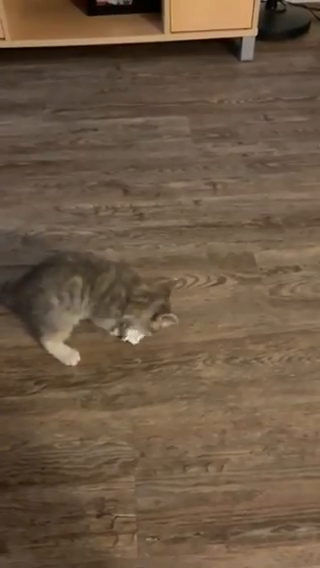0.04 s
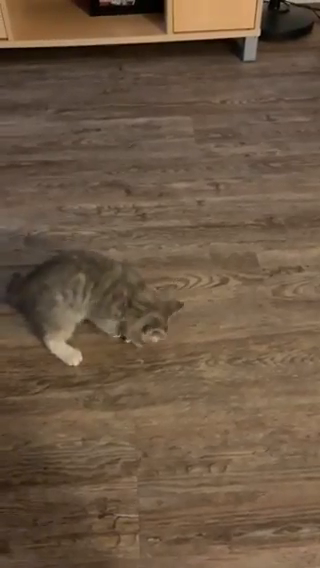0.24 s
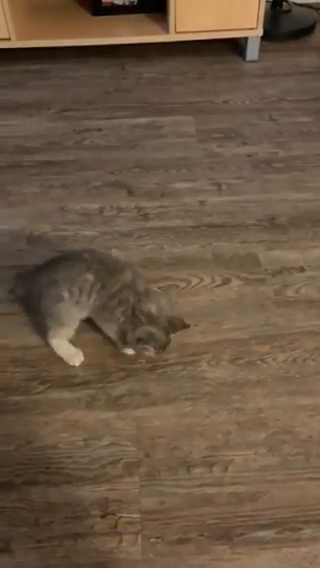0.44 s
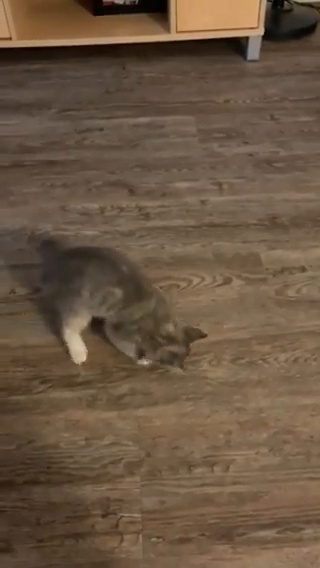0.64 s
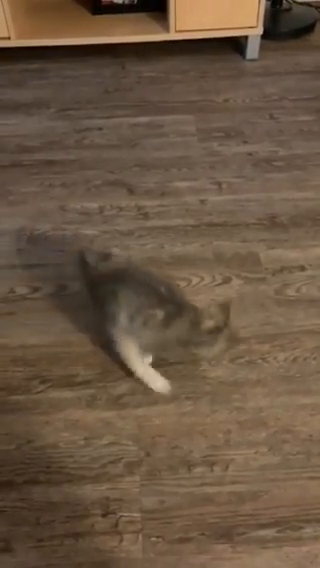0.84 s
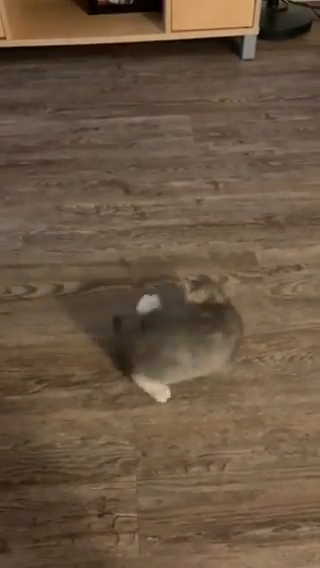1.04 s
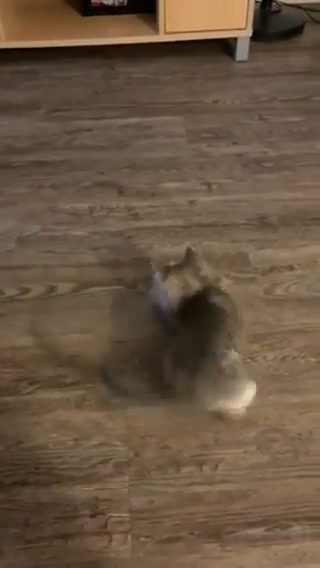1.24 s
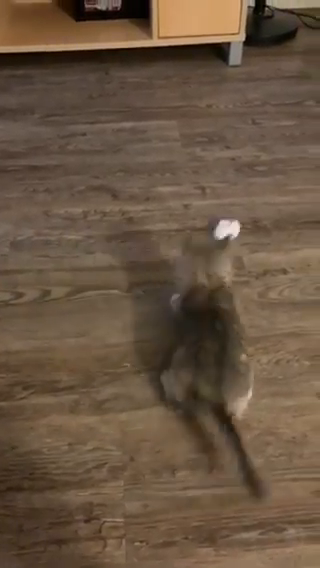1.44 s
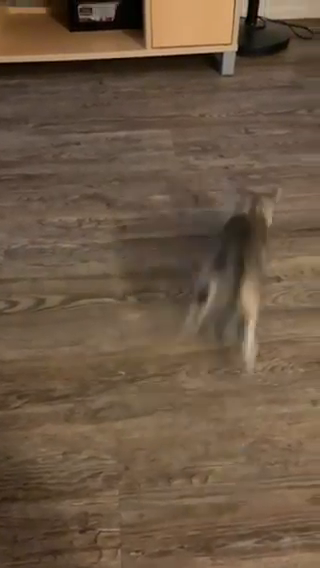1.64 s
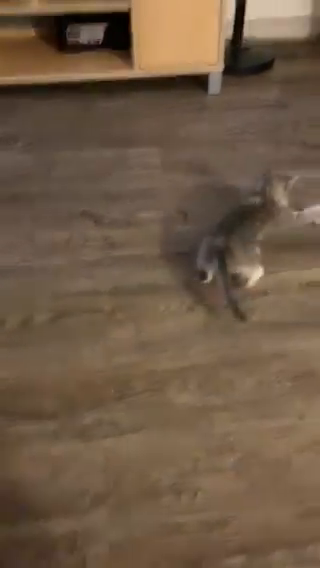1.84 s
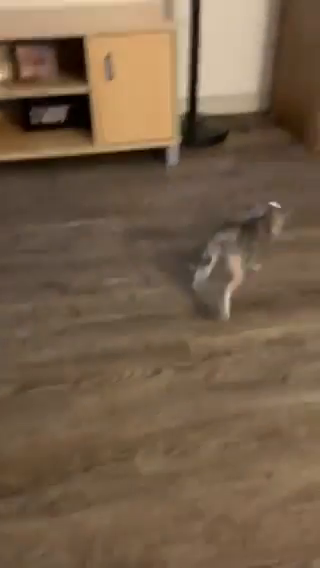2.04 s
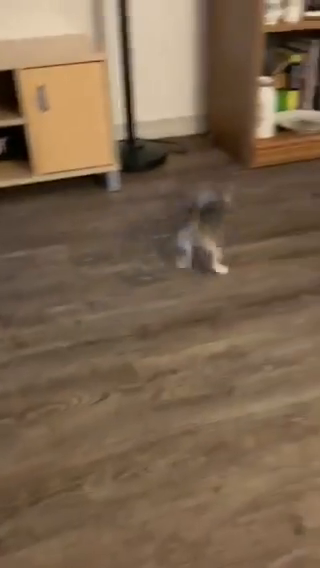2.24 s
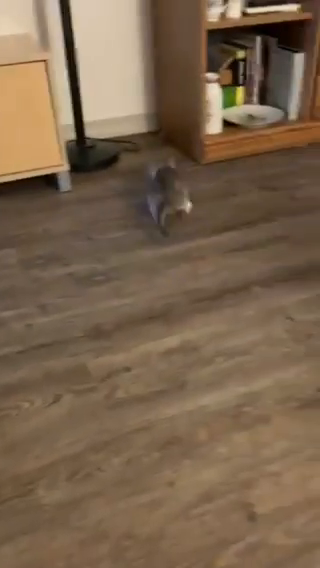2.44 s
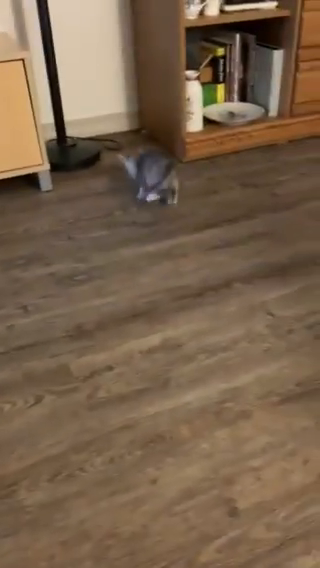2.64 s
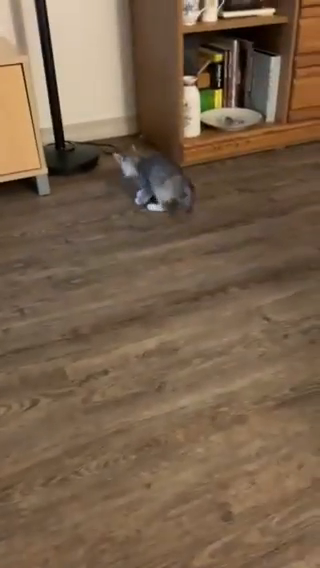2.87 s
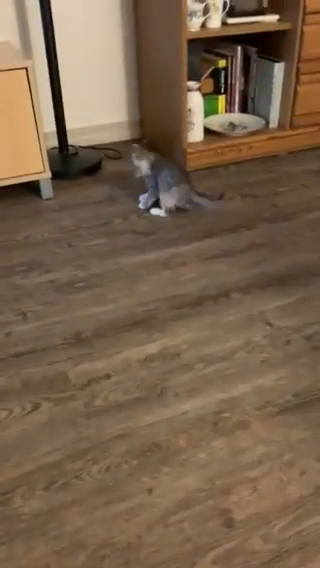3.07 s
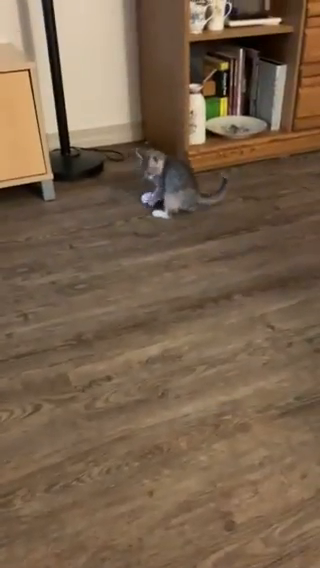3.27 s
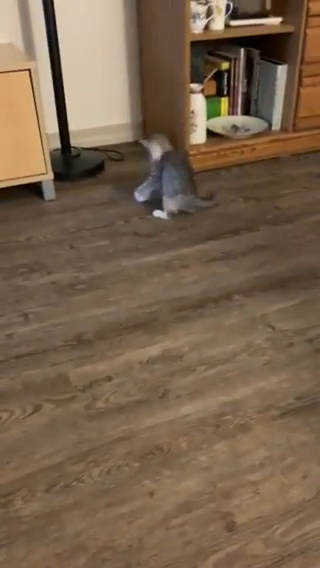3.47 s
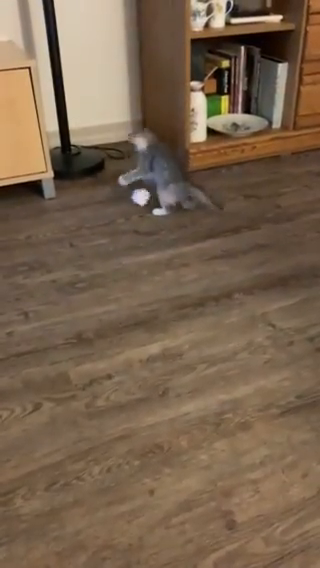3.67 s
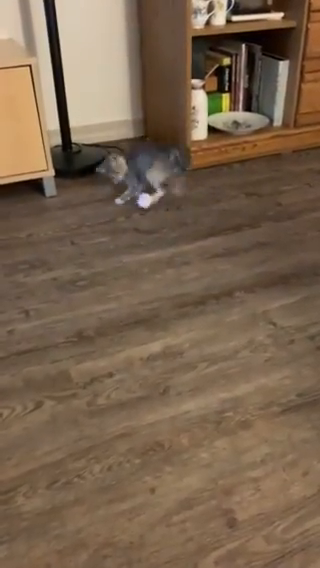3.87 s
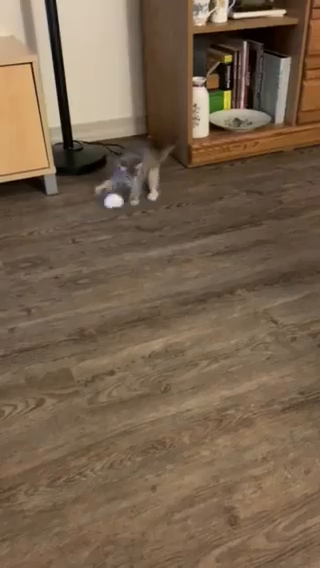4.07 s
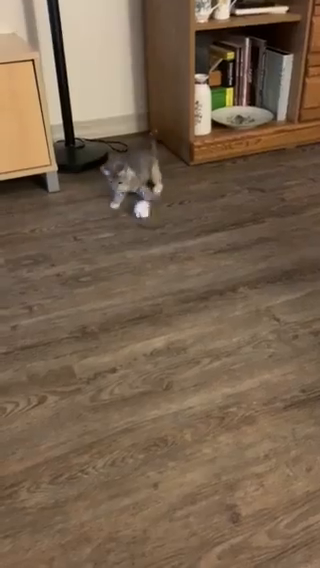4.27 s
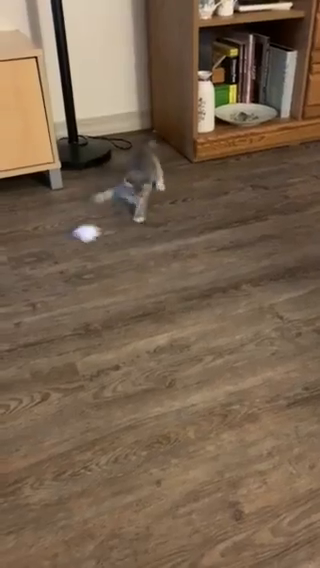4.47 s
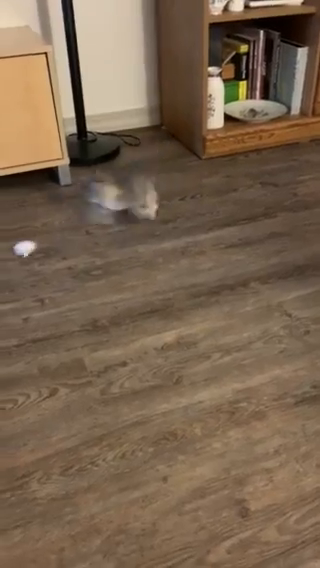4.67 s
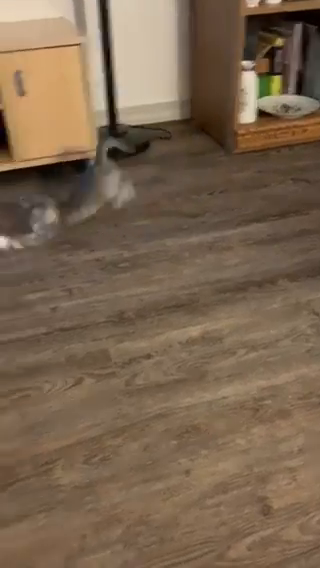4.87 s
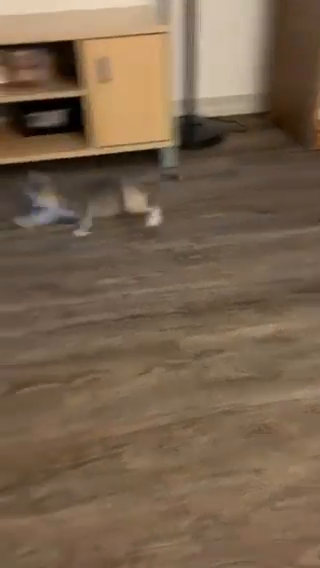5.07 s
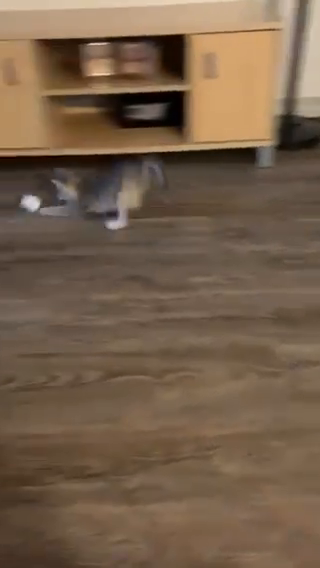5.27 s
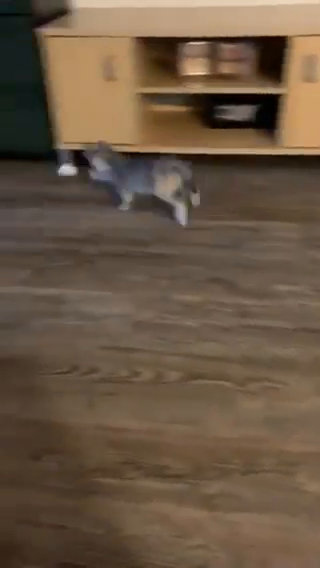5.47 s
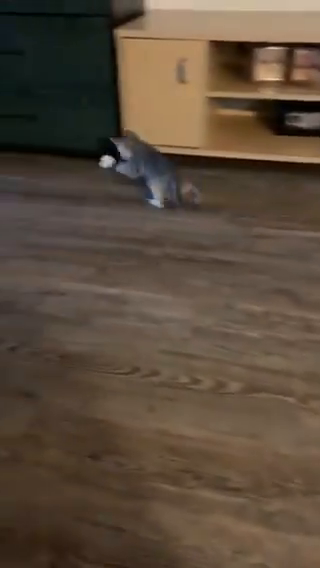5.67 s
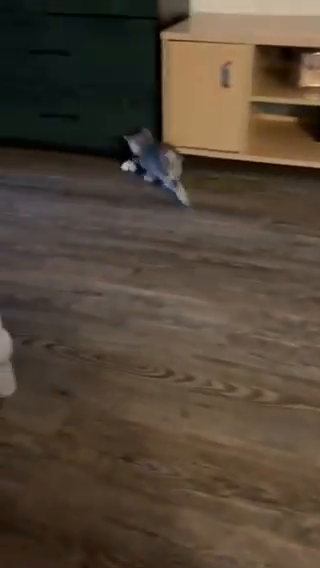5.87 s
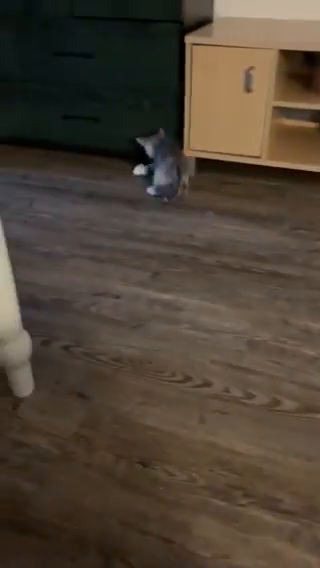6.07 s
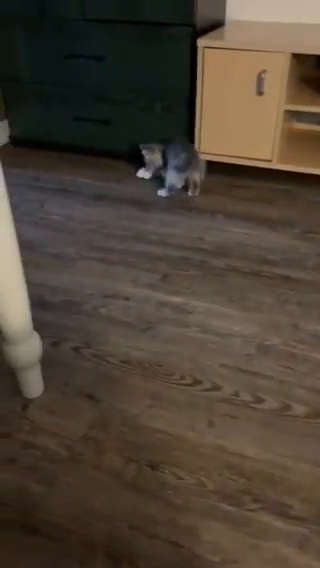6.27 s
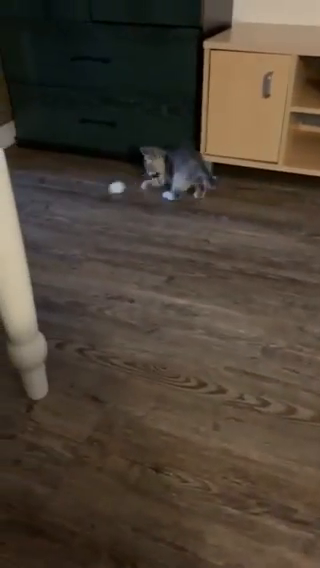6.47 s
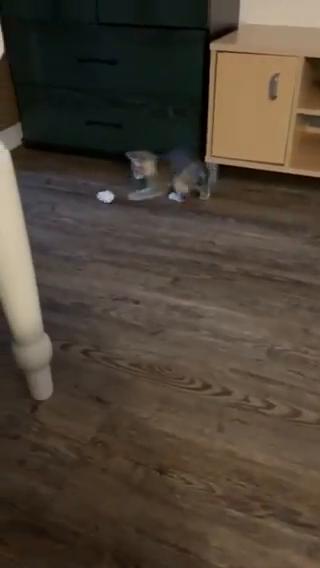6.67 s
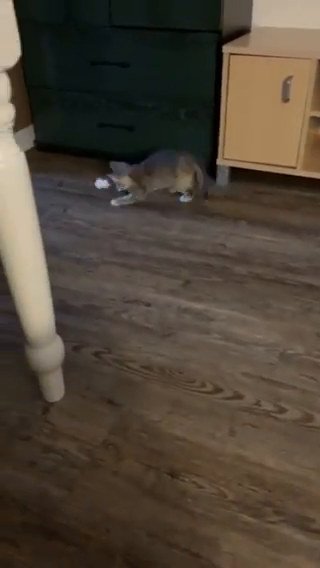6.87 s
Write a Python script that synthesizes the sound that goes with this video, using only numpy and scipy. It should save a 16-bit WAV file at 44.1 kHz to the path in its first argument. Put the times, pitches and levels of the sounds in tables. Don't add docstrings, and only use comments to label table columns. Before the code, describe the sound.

A kitten bats a crumpled paper ball across a wooden floor, with dry crackly skids, claw clicks and soft paw thuds in a small room.

```python
import sys
import numpy as np
from scipy import signal
from scipy.fft import rfft, irfft, next_fast_len
from scipy.io import wavfile
from scipy.ndimage import uniform_filter1d, map_coordinates

SR = 44100
rng = np.random.default_rng(int(sys.argv[2]) if len(sys.argv) > 2 else 0)


def wrap_up_sound(samples):
    columns = np.atleast_2d(samples).T
    tamed = np.clip(columns, -1, 1)
    steps = np.round(tamed * 32767).astype(np.int16)
    wavfile.write(sys.argv[1], SR, steps)


def attenuation_scalar(level_db):
    decades = np.asarray(level_db, float) / 20
    return 10 ** decades


N = 305172

# (peak time [s], level [dB], brightness [dB], favoured resonance [Hz], fall [dB/s])
FLICKS = [(0.482, -62, -10, 1660, 248.5), (0.892, -61, -14, 2220, 92), (1.672, -55.5, 3.5, 2170, 218),
          (2.082, -45.5, -23, 2100, 182), (2.284, -42.5, -4, 1870, 115), (3.26, -41.5, -7.5, 1950, 152),
          (3.534, -43, -2, 2900, 173), (3.74, -51, -11, 2400, 146), (3.987, -49, -6, 2700, 193),
          (4.387, -42, -1.5, 2800, 129), (4.632, -45, -4, 2360, 214), (4.718, -44.5, -11, 1810, 90.5),
          (4.872, -36, 1, 2930, 200), (5.154, -46.5, -15, 2420, 903), (5.263, -33, -8, 2450, 35),
          (6.232, -54.5, -33, 1860, 205), (1.27, -46.5, -1.5, 4300, 40), (1.877, -36, -2.5, 2670, 131),
          (6.409, -41, -3.5, 2840, 13), (6.802, -40, -8, 2080, 57)]
# (peak time [s], level [dB], brightness [dB], favoured resonance [Hz], fall [dB/s])
SLIDES = [(1.389, -48.5, -5.5, 4860, 88), (1.58, -55, -9, 1680, 40), (1.8, -60.5, -8, 2450, 100),
          (2.474, -42.5, -6.5, 1550, 181), (4.18, -50, -5.5, 1800, 60), (4.55, -51, -7, 2135, 114),
          (5.03, -56, -13, 2430, 140), (5.469, -44.5, 2, 2290, 76), (5.78, -53.5, -4, 2060, 42.3),
          (5.926, -50.5, -6, 1800, 156), (6.62, -52, -6.5, 1466, 58.7), (4.27, -64, -14, 2200, 60),
          (6.02, -61, -16, 1520, 120)]
# (frequency [Hz], level [dB])
PAPER_BODY = [(300, -18.5), (700, -8.5), (1200, -1.5), (2200, -2), (3300, -1), (4500, -5), (7000, -28.5)]
# (frequency [Hz], level [dB])
PAPER_EDGE = [(3500, -20), (5200, 0.5), (6200, -0.5), (7600, -3.5), (8700, 0.5), (9600, -0.5),
              (11000, -7.5), (13000, -8), (16000, -12)]
# (time [s], peak [dB], ring [Hz], treble [dB], treble centre [Hz])
CORNERS = [(1.275, -32, 1640, -6, 6000), (1.473, -36, 1370, -21, 11200), (1.511, -38.5, 1320, -19, 6500),
           (1.606, -36, 1550, -17, 5810), (1.855, -22.5, 3600, -13.5, 6060), (1.887, -22, 2380, -15, 7200),
           (2.077, -30.5, 1110, -20.5, 10000), (3.514, -28.5, 2940, -15, 7500),
           (3.578, -48, 2800, -10, 7090), (4.381, -28, 2600, -15, 12000), (4.505, -34.5, 1280, -18, 11600),
           (4.617, -25.5, 2970, -22, 5950), (4.708, -36, 2700, -19, 11500), (4.721, -20, 1910, -37, 6700),
           (4.881, -32, 3400, -24, 6260), (5.257, -19.5, 2030, -14.5, 5950),
           (5.272, -15.5, 2040, -22.5, 5900), (5.383, -29.5, 1410, -18, 5270),
           (5.399, -31, 1220, -4, 11000), (6.393, -28.5, 3040, -20, 7400), (6.477, -41, 2830, -2.5, 11100),
           (6.493, -34.5, 1310, -11, 5990), (6.519, -30.5, 1270, -12, 6800),
           (6.582, -34.5, 1240, -7.5, 10400), (6.617, -36, 1920, -12.5, 10600),
           (6.797, -25.5, 2980, -26, 5410), (6.892, -38, 1540, -3.5, 8350)]
# (time [s], peak [dB], ring [Hz], treble [dB], treble centre [Hz])
RATTLES = [(1.214, -41, 1580, -21, 7050), (1.284, -34, 4200, -7, 6040), (1.31, -36, 4400, -6, 6740),
           (1.436, -39, 4600, -16, 5910), (1.86, -32, 3670, -22, 6350), (1.872, -33, 3440, -12, 8700),
           (1.894, -18, 2460, -10.5, 7350), (1.899, -42, 2360, -18, 7600), (1.923, -33, 2350, -23, 5500),
           (3.7245, -42, 3460, -6.5, 7000), (4.674, -34, 1750, -12.5, 5900), (4.839, -42, 1740, -18, 12000),
           (4.847, -26, 3060, -10, 8500), (4.854, -27, 3000, -2.5, 10200), (4.869, -24, 2920, -8, 7900),
           (4.884, -21, 3000, -12, 9500), (5.03, -22, 3800, -13.5, 5580), (5.143, -26.5, 1870, -12, 5900),
           (5.147, -23.5, 2600, -11.5, 8900), (5.1695, -20.5, 1210, -11, 8300),
           (5.214, -35, 1630, -2.5, 8500), (5.237, -24, 1510, -12, 9000), (5.2525, -15, 2000, -10, 9600),
           (5.262, -29, 2030, 8, 8700), (5.268, -24, 2800, -17, 5930), (5.278, -29, 2540, -13, 6250),
           (5.327, -25.5, 1960, 0, 10100), (5.332, -19.5, 1290, -5, 10600),
           (5.403, -27.5, 2800, -11, 10400), (6.407, -44.5, 3000, -14, 9000), (6.418, -34, 2660, -19, 9000),
           (6.44, -28, 2650, -21, 6160), (6.457, -30, 1060, -24, 5930), (6.644, -36.5, 1380, -11, 6360),
           (6.773, -27.5, 1260, -9.5, 7220), (6.816, -27, 2320, -20, 6000), (6.8385, -35, 2180, 0, 10500)]
# (time [s], peak [dB], ring [Hz], treble [dB])
CLAWS = [(0.4705, -55, 1120, -31), (0.8917, -43.5, 2960, -12), (0.999, -50, 2940, -13),
         (1.0576, -50, 1710, -14), (1.0994, -51, 970, -15), (4.1267, -46, 2350, -6),
         (1.751, -46, 1340, -11), (1.8152, -41.5, 1660, -11.5), (1.9824, -40.5, 1560, -15),
         (2.1023, -30, 3330, -12), (2.2678, -23.5, 1490, -15), (2.3664, -53, 1210, -25),
         (2.405, -42.5, 1700, -6.5), (3.3656, -47, 1700, -14), (3.7282, -31.5, 1290, -16),
         (3.811, -41, 1590, -11), (3.9582, -39, 2970, -14), (4.0215, -44.5, 1710, -11),
         (4.0967, -35, 1810, -27), (4.1444, -33, 1640, -17), (4.4187, -31, 2130, -8),
         (4.5373, -31.5, 1430, -11), (5.004, -39, 1280, -10.5), (5.6241, -38.5, 2820, -12.5),
         (5.688, -44, 1830, -12.5), (5.7379, -37, 1010, -17), (5.82, -45, 1020, -2)]
# (time [s], peak [dB], ring [Hz], treble [dB], t60 [s])
SWIPES = [(0.876, -41, 1540, -8, 0.17), (1.2084, -36, 1530, -17, 0.2), (1.236, -32, 2850, -8.5, 0.075),
          (1.652, -30, 4020, -12.5, 0.13), (1.8422, -26.5, 3730, -9, 0.12),
          (2.2438, -35.5, 1350, -31, 0.34), (2.4307, -37, 1046, -23, 0.21), (2.6922, -55, 1030, -13, 0.12),
          (3.23, -39, 2820, -18, 0.39), (3.475, -35.5, 3020, -9.5, 0.27), (4.337, -34, 2000, -8.5, 0.083),
          (4.8378, -31.5, 2850, -17, 0.09), (5.2358, -32.5, 2000, -5.5, 0.18),
          (6.1874, -44, 3000, -12.5, 0.3), (6.3495, -33.5, 1020, -14, 0.2), (6.7675, -32, 2290, -7, 0.14),
          (1.672, -37.5, 3860, 1.5, 0.058), (4.456, -34.5, 2400, -5, 0.07),
          (4.389, -27.5, 2950, -26, 0.054)]
# (frequency [Hz], level [dB])
FLOOR_KNOCK = [(130, -55), (330, -3), (600, 0), (900, -5), (1700, -40)]
# (time [s], peak [dB], centre [Hz], t60 [s])
SLAPS = [(0.82, -59, 563, 0.039), (2.147, -46, 410, 0.049), (2.266, -42, 506, 0.08), (2.44, -53, 500, 0.27),
         (3.115, -68, 844, 0.47), (3.814, -45.5, 480, 0.042), (4.436, -59, 350, 0.12),
         (4.884, -51.5, 402, 0.14), (5.201, -55, 284, 0.28), (5.875, -58.5, 700, 0.43),
         (6.47, -50.5, 990, 0.38), (6.8, -53, 280, 0.16)]
# (time [s], peak [dB], board note [Hz], weight on the boards [dB])
PAWS = [(0.589, -49, 90, -60), (0.819, -51, 120, -57), (0.899, -45, 86, -56), (0.993, -51, 150, -55),
        (1.065, -50.5, 121, -61.5), (1.154, -54, 72.7, -62), (1.237, -64, 155, -61), (1.543, -54, 117, -64),
        (1.636, -40.5, 99, -54), (1.75, -39.5, 123, -52.5), (1.812, -53, 125, -44),
        (1.961, -42.5, 112, -58), (2.149, -47, 104, -48), (2.266, -32, 93, -48), (2.449, -39, 168, -45),
        (2.706, -56.5, 171, -62), (5.2, -46, 90.5, -66), (3.812, -56, 92, -55), (4.007, -69, 94.2, -57),
        (4.376, -52, 183, -76), (4.423, -54, 170, -79), (4.672, -42, 111, -52), (4.85, -37, 116, -49),
        (4.996, -43, 97, -40), (5.3, -38, 118, -49), (5.579, -55, 133, -49.5), (5.643, -50, 125, -65),
        (5.757, -53, 94.2, -55), (6.089, -51.5, 189, -83), (4.953, -44, 160, -56)]
# (frequency [Hz], level [dB])
BOARDS = [(30, -12), (58, -1), (80, -5.5), (105, 0), (150, -5), (195, -6), (260, -14.5), (450, -43.5)]
# (peak time [s], level [dB], climb [dB/s], fall [dB/s])
SWISHES = [
    (1.31, -66, 200, 200),
    (1.675, -45, 500, 250),
    (1.875, -50, 402, 151),
    (3.525, -64, 300, 152),
    (4.66, -55, 300, 152),
    (4.87, -48, 500, 170),
    (5.27, -48, 500, 152),
    (5.43, -55, 150, 120),
    (6.46, -57, 100, 100),
    (6.78, -53.5, 900, 120),
]
# (frequency [Hz], level [dB])
FUR = [(8000, -28), (11500, -5), (13500, 2), (16000, -0.5)]
# (time [s], peak [dB], ring [Hz], treble [dB], treble centre [Hz])
TICKS = [
    (3.302, -56, 3000, 0, 9500),
    (3.317, -56, 3000, -2, 9500),
    (3.332, -58, 3000, -2, 9500),
    (3.35, -55, 3000, 0, 9500),
    (3.3665, -50, 3000, 1, 9500),
    (3.5797, -42, 2800, 3, 9000),
    (4.125, -46, 2400, 3.5, 8040),
    (5.433, -47, 2500, -3, 8700),
    (1.2765, -33, 4270, -13, 5800),
    (1.8137, -48, 1700, -5, 9000),
]
# (frequency [Hz], t60 [s])
ROOM_T60 = [(200, 0.33), (1500, 0.29), (5000, 0.22), (14000, 0.14)]
# (frequency [Hz], level [dB])
LINGER = [(300, -26), (550, 7), (1000, 9.5), (1900, -35)]
# (frequency [Hz], level [dB])
AIR = [(25, -31), (55, 5.5), (120, -4.5), (160, -7.5), (320, -1), (420, -10), (1000, -20.5), (1600, -28),
       (3000, -38), (8000, -37), (16000, -40.5)]
# (frequency [Hz], phase waver [rad], level [dB])
HUM = (354, 1.1, -72)
# (frequency [Hz], likeness [0-1])
LIKENESS = [(60, 0.99), (150, 0.86), (350, 0.86), (800, 0.27), (1300, 0.58), (2200, 0.22), (2700, 1),
            (3500, 0.99), (4500, 0.83)]
# (first opposed [Hz], spacing per full turn [Hz], onset of steady delay [Hz])
LAG = (4640, 4325, 4200)
# (frequency [Hz], angle [rad])
LOW_TURN = [(300, 0), (750, .6), (1050, -.4), (1500, -.65), (2000, 0), (2350, 1.4), (3400, 1.5),
            (3900, 1.95)]
# (frequency [Hz], gain [dB])
LOW_CUT = [(15, -32), (28, -9), (50, 1.5)]
# (frequency [Hz], gain [dB])
TOP_CUT = [(15800, 0), (15900, -12), (16600, -14), (16750, -90)]
STEREO_EDGES_HZ = [3790, 4400, 4690, 5170, 5685, 6290] + [6890 + 689 * k for k in range(15)]

FLICK_RISE_DB_PER_S, SLIDE_RISE_DB_PER_S = 504, 102
HALT_DB_PER_S2 = 499
EDGE_FALL_RATIO = 1.13
REST_DB, REST_BRIGHT_DB = -81.5, -6.5
FOLD_SAG_OCT_PER_DB, FOLD_WANDER_OCT = 0.022, 0.19
CLAW_KNOCK_DB, CORNER_KNOCK_DB, RATTLE_KNOCK_DB, SWIPE_KNOCK_DB = -17.5, -52, -37, -18.5
KNOCK_LAG_SHARE = 0.56
CLAW_T60_S, CORNER_T60_S, RATTLE_T60_S, SHORTEN_PER_DB = 0.11, 0.076, 0.038, 0.033
CLAW_EDGE_HZ = 9600
PAW_T60_S, LEAN_S = 0.15, 0.015
LOAD_DB_PER_S, SETTLE_DB_PER_S, STILL_DB = 244, 142, -66.5
LINGER_DB, LINGER_FALL_DB_PER_S = -29, 9
LEFT_DB = -0.5


def unit(x):
    return x / np.sqrt(np.mean(x ** 2) + 1e-20)


def along(points, hz):
    f, v = np.transpose(points)
    return np.interp(np.log(hz + 1), np.log(f + 1), v)


def wobble(rate_hz):
    knots = rng.standard_normal(int(N * rate_hz / SR) + 4)
    return map_coordinates(knots, [np.arange(N) * rate_hz / SR])


def filtered(x, response):
    m = next_fast_len(x.shape[-1] + 8192)
    return irfft(rfft(x, m) * response(np.fft.rfftfreq(m, 1 / SR)), m)[..., :x.shape[-1]]


def hiss(spectrum, size=N):
    m = next_fast_len(size)
    gain = attenuation_scalar(along(spectrum, np.fft.rfftfreq(m, 1 / SR)))
    return unit(irfft(rfft(rng.standard_normal(m)) * gain, m)[:size])


def levelled(x):
    return x / np.sqrt(np.abs(uniform_filter1d(x ** 2, size=SR // 14)) + 1e-20)


def swells(peak_s, db, rise, fall, halt=0):
    after_s = np.arange(0, N / SR, 1 / 1000) - np.c_[peak_s]
    slope = np.where(after_s < 0, np.c_[rise], -np.c_[fall])
    return attenuation_scalar(np.c_[db] + slope * after_s - halt * after_s ** 2) ** 2


def spread(x):
    return np.interp(np.arange(N) * 1000 / SR, np.arange(len(x)), x)


def gritty(rate_hz, spread_db, share, slip_s):
    size_db = spread_db * np.minimum(rng.exponential(size=N), 2)
    starts = (rng.random(N) < rate_hz / SR) * attenuation_scalar(size_db)
    envelope = signal.lfilter([1], [1, -np.exp(-1 / (SR * slip_s))], starts)
    slips = envelope * rng.standard_normal(N)
    share = np.clip(share, 0, .9)
    return np.sqrt(share) * unit(slips) + np.sqrt(1 - share) * rng.standard_normal(N)


def patchy(x, centre_hz, lift_db, octaves, patchy_db):
    hz, t, z = signal.stft(x, SR, nperseg=256)
    field = uniform_filter1d(rng.standard_normal(z.shape), size=3, axis=0)
    field = uniform_filter1d(field, size=9, axis=1)
    centre = centre_hz[np.minimum((t * SR).astype(int), N - 1)]
    bump = np.exp(-.5 * (np.log2((hz[:, None] + 1) / centre) / octaves) ** 2)
    gain = attenuation_scalar(patchy_db * unit(field) + lift_db * bump)
    return signal.istft(z * gain, SR, nperseg=256)[1][:N]


def skid():
    s, db, bright_db, hz, fall = np.transpose(FLICKS + SLIDES)
    rise = np.repeat([FLICK_RISE_DB_PER_S, SLIDE_RISE_DB_PER_S], [len(FLICKS), len(SLIDES)])
    power = swells(s, db, rise, fall, HALT_DB_PER_S2)
    body_level = spread(np.sqrt(power.sum(0) + attenuation_scalar(REST_DB) ** 2))
    edge_power = swells(s, db + bright_db, rise, EDGE_FALL_RATIO * fall, HALT_DB_PER_S2).sum(0)
    edge_level = spread(np.sqrt(edge_power + attenuation_scalar(REST_DB + REST_BRIGHT_DB) ** 2))
    lead = power.argmax(0)
    faded_db = np.clip(db[lead] - 10 * np.log10(power.max(0) + 1e-20), 0, 30)
    centre_hz = spread(hz[lead] * 2 ** (-FOLD_SAG_OCT_PER_DB * faded_db))
    centre_hz = centre_hz * 2 ** (FOLD_WANDER_OCT * wobble(9))
    grit = gritty(rate_hz=650, spread_db=3.5, share=.65, slip_s=.0006)
    grit = patchy(grit, centre_hz, lift_db=9, octaves=.16, patchy_db=2.2)
    flutter = attenuation_scalar(2.1 * wobble(45))
    body = levelled(filtered(grit, lambda hz: attenuation_scalar(along(PAPER_BODY, hz))))
    edge = levelled(filtered(grit, lambda hz: attenuation_scalar(along(PAPER_EDGE, hz))))
    return attenuation_scalar(-6.5) * flutter * (body_level * body + attenuation_scalar(3.5) * edge_level * edge)


def contacts(rows, rise_share, snap, burst_db, ring_db, edge_db, gain_db, size):
    out, t = np.zeros(N + SR), np.arange(size) / SR
    for s, db, hz, treble_db, edge_hz, knock_db, t60 in rows:
        t60 = max(t60, .01)
        rise = (1 - np.exp(-t / (rise_share * t60))) * (1 + snap * attenuation_scalar(-60 * t / 0.026))
        burst = attenuation_scalar(burst_db) * hiss(PAPER_BODY, size=size) * attenuation_scalar(-60 * t / t60)
        fold = [(.72 * hz, -28), (hz, 0), (1.39 * hz, -28)]
        ring = attenuation_scalar(ring_db) * hiss(fold, size=size) * attenuation_scalar(-60 * t / (0.88 * t60))
        edge = [(f, level + edge_db * np.exp(-(np.log2(f / edge_hz) / 0.12) ** 2))
                for f, level in PAPER_EDGE]
        tick = attenuation_scalar(treble_db + 11.5) * hiss(edge, size=size) * attenuation_scalar(-60 * t / (1.03 * t60))
        knock = attenuation_scalar(knock_db + 7.5) * hiss(FLOOR_KNOCK, size=size) * attenuation_scalar(-60 * t / (1.19 * t60))
        out[round(s * SR):][:size] += attenuation_scalar(db + gain_db) * rise * (burst + ring + tick + knock)
    return out[:N]


def knock_level(base_db, db):
    return base_db - KNOCK_LAG_SHARE * (db + 41)


def taps(rows, base_db, t60_s):
    return [(*row, knock_level(base_db, row[1]), t60_s * np.exp(-SHORTEN_PER_DB * (row[1] + 38)))
            for row in rows]


def clicks():
    claw_rows = taps([(*row, CLAW_EDGE_HZ) for row in CLAWS], CLAW_KNOCK_DB, CLAW_T60_S)
    corner_rows = taps(CORNERS, CORNER_KNOCK_DB, CORNER_T60_S)
    rattle_rows = taps(RATTLES, RATTLE_KNOCK_DB, RATTLE_T60_S)
    swipe_rows = [(s, db, hz, treble_db, CLAW_EDGE_HZ, knock_level(SWIPE_KNOCK_DB, db), t60)
                  for s, db, hz, treble_db, t60 in SWIPES]
    claws = contacts(claw_rows, rise_share=0.0038, snap=0.32, burst_db=-.5, ring_db=-2.5,
                     edge_db=3, gain_db=-11, size=SR // 5)
    corners = contacts(corner_rows, rise_share=0.015, snap=0.4, burst_db=-4.5, ring_db=-0.5,
                       edge_db=11.5, gain_db=-11.5, size=SR // 6)
    rattles = contacts(rattle_rows, rise_share=0.029, snap=0.43, burst_db=-1, ring_db=-3,
                       edge_db=11, gain_db=-12.5, size=SR // 9)
    swipes = contacts(swipe_rows, rise_share=0.074, snap=0, burst_db=-1.0, ring_db=-1.5,
                      edge_db=0, gain_db=-9.0, size=SR // 3)
    return claws + corners + rattles + swipes


def slaps():
    out, t = np.zeros(N + SR), np.arange(SR // 3) / SR
    for s, db, hz, t60 in SLAPS:
        puff = hiss([(.4 * hz, -35), (.75 * hz, 0), (1.3 * hz, 0), (2.4 * hz, -35)], size=len(t))
        out[round(s * SR):][:len(t)] += attenuation_scalar(db - 60 * t / t60) * (1 - np.exp(-t / 0.00041)) * puff
    return out[:N]


def paws():
    out, t = np.zeros(N + SR), np.arange(SR // 2) / SR
    for s, db, hz, _ in PAWS:
        drift = np.cumsum(rng.standard_normal(len(t))) * 0.014
        note = np.sin(2 * np.pi * hz * t + drift) * attenuation_scalar(-60 * t / PAW_T60_S) * (1 - np.exp(-t / 0.0036))
        out[round(s * SR):][:len(t)] += attenuation_scalar(db - 3.0) * note
    notes = filtered(out[:N], lambda f: 1 / (1 + (45 / (f + 1)) ** 6))
    s, _, _, weight_db = np.transpose(PAWS)
    power = swells(s + LEAN_S, weight_db, [LOAD_DB_PER_S], [SETTLE_DB_PER_S]).sum(0)
    weight = spread(np.sqrt(power + attenuation_scalar(STILL_DB) ** 2))
    return notes + weight * attenuation_scalar(-5.0 + 3.64 * wobble(12)) * hiss(BOARDS)


def brushing():
    level = spread(np.sqrt(swells(*np.transpose(SWISHES)).sum(0)))
    swish = level * attenuation_scalar(2.5 * wobble(60)) * hiss(FUR)
    rows = [(*row, -30, 0.025) for row in TICKS]
    ticks = contacts(rows, rise_share=0.01, snap=0.43, burst_db=-3.5, ring_db=-3,
                     edge_db=11.5, gain_db=-12, size=SR // 12)
    return swish + ticks


def room(x):
    out, step = np.zeros((2, N + SR)), SR // 4
    for start in range(0, N, step):
        hz, t, z = signal.stft(rng.standard_normal((2, SR // 3)), SR, nperseg=256)
        decay = attenuation_scalar(-60 * t / along(ROOM_T60, hz)[:, None])
        tail = signal.istft(z * decay, SR, nperseg=256)[1]
        wet = signal.fftconvolve(x[None, start:start + step], tail / np.linalg.norm(tail[0]), axes=1)
        out[:, start + 150:start + 150 + wet.shape[1]] += wet
    return out[:, :N]


def lingering():
    s, _, _, weight_db = np.transpose(PAWS)
    power = swells(s, weight_db, [LOAD_DB_PER_S], [LINGER_FALL_DB_PER_S]).sum(0)
    return spread(np.sqrt(power)) * attenuation_scalar(LINGER_DB + 1.9 * wobble(11)) * hiss(LINGER)


def air():
    hz, waver_rad, db = HUM
    phase = 2 * np.pi * hz * np.arange(N) / SR + waver_rad * wobble(9)
    hum = np.sin(phase) * attenuation_scalar(4.5 * wobble(11))
    still = patchy(hiss(AIR), np.full(N, hz), lift_db=0, octaves=1, patchy_db=1.5)
    return attenuation_scalar(-67 + 0.11 * wobble(3.3)) * still + attenuation_scalar(db) * hum


def scene():
    play = skid() + clicks() + slaps()
    background = np.array([air() + lingering(), air() + lingering()])
    return play + paws() + attenuation_scalar(-6.5) * room(play) + background + brushing()


def thinned(pair, margin_db, unrest_db, coarse_rad, sparse_hz):
    sum_difference = np.array([pair[0] + pair[1], pair[0] - pair[1]]) / 2
    hz, t, z = signal.stft(sum_difference, SR, nperseg=1024)
    band, frame = np.searchsorted(STEREO_EDGES_HZ, hz), np.arange(len(t)) // 2
    bins = np.arange(len(hz))
    member = band[:, None] == band
    upper = band[:, None] > 0
    power = uniform_filter1d(member @ np.abs(z) ** 2, size=3, axis=2) + 1e-20
    chance = rng.standard_normal(z.shape)[:, :, frame]
    keep = 10 * np.log10(power / power[::-1]) > margin_db + unrest_db * chance[:, band]
    keep |= ~upper
    keep &= (hz[:, None] < sparse_hz) | (chance[:, bins // 5] < .45)
    level_db = 10 * np.log10((np.abs(z[:, band > 0]) ** 2).sum((0, 1)) + 1e-20)
    attack = np.diff(level_db, prepend=0) > 9
    keep = (keep & (hz[:, None] < TOP_CUT[0][0])) | attack
    blur_rad = coarse_rad * chance[:, ::-1][:, bins // 8] * (upper & ~attack)
    total, difference = signal.istft(z * keep * np.exp(1j * blur_rad), SR, nperseg=1024)[1][:, :N]
    return np.array([total + difference, total - difference])


def top_cut(x):
    return signal.sosfilt(signal.butter(12, 16680, fs=SR, output="sos"), x)


def record(dry):
    opposed_hz, turn_hz, start_hz = LAG

    def blend(hz):
        return np.arccos(np.clip(along(LIKENESS, hz), -1, 1)) / 2

    def turn(hz):
        delay = np.pi + 2 * np.pi * (hz - opposed_hz) / turn_hz
        angle = np.where(hz > start_hz, delay, along(LOW_TURN, hz))
        return attenuation_scalar(along(TOP_CUT, hz) + along(LOW_CUT, hz)) * np.exp([[.5j], [-.5j]] * angle)

    mid = filtered(dry[0], lambda hz: np.cos(blend(hz)))
    side = filtered(dry[1] - 0.64 * dry[0], lambda hz: 1.33 * np.sin(blend(hz)))
    pair = filtered(attenuation_scalar([[LEFT_DB], [0]]) * [mid + side, mid - side], turn)
    mix = thinned(pair, margin_db=-6, unrest_db=1.4, coarse_rad=.6, sparse_hz=13780)
    return top_cut(mix)


dry = scene()
out = record(dry)
wrap_up_sound(out)
```